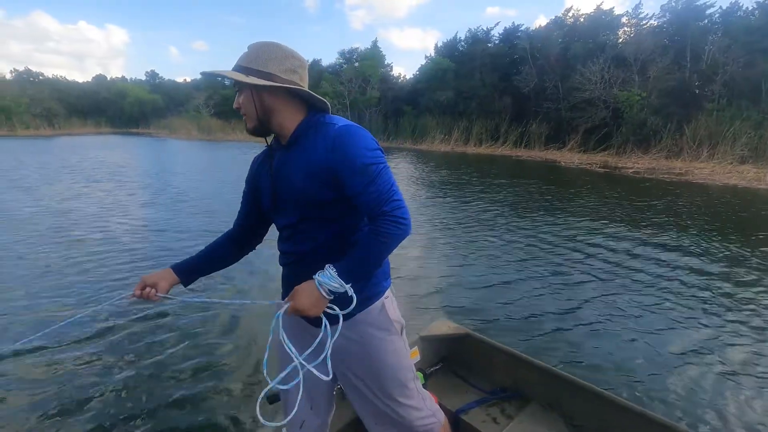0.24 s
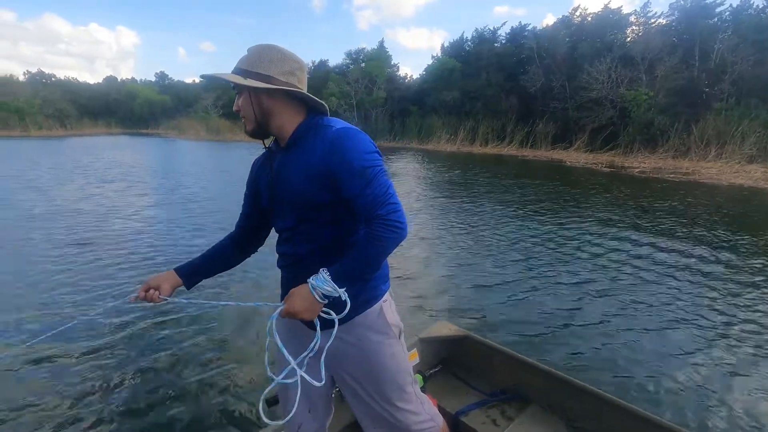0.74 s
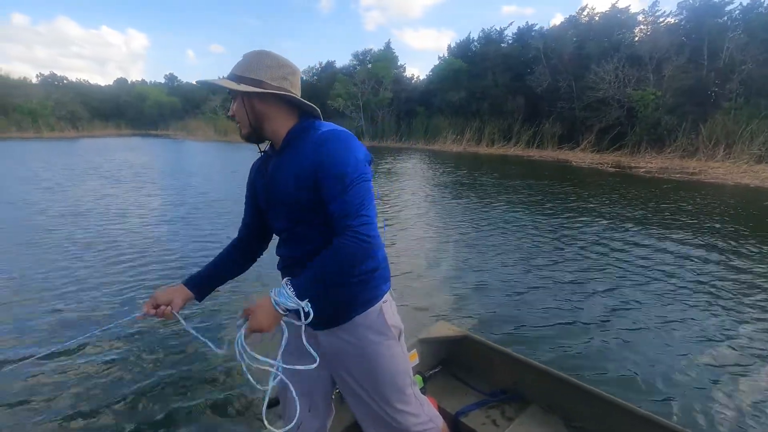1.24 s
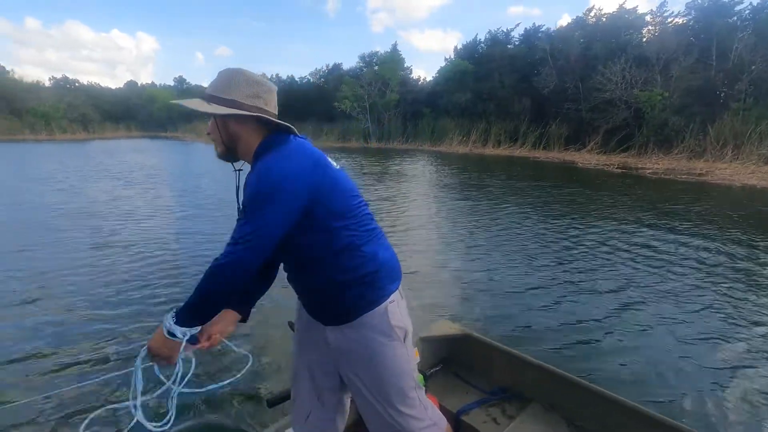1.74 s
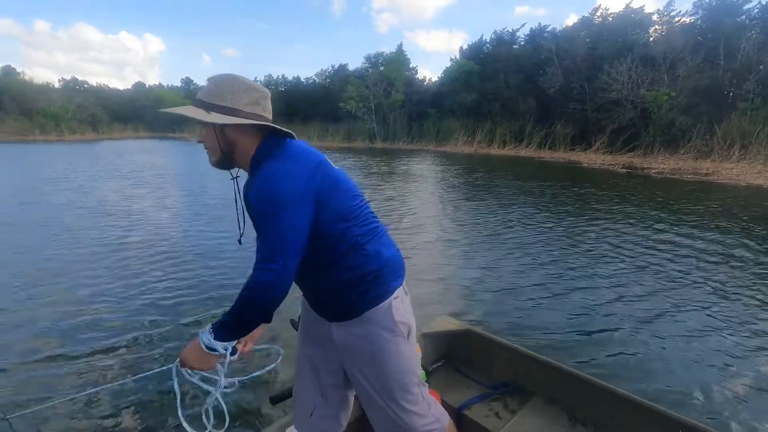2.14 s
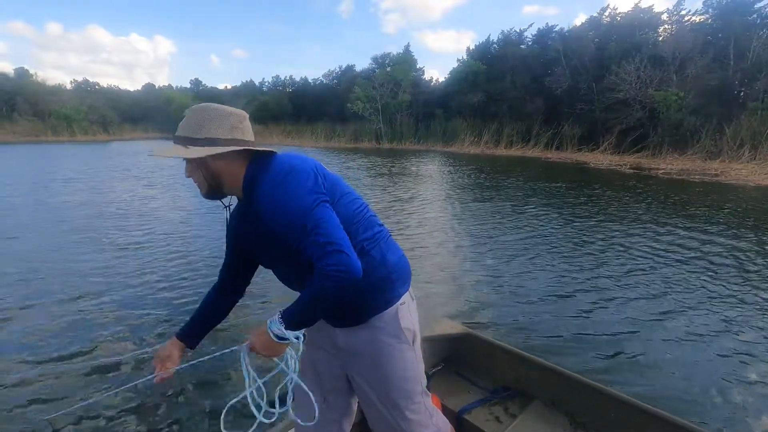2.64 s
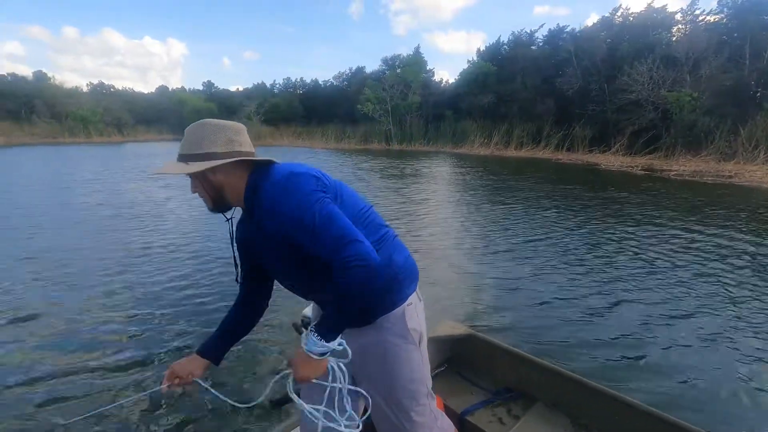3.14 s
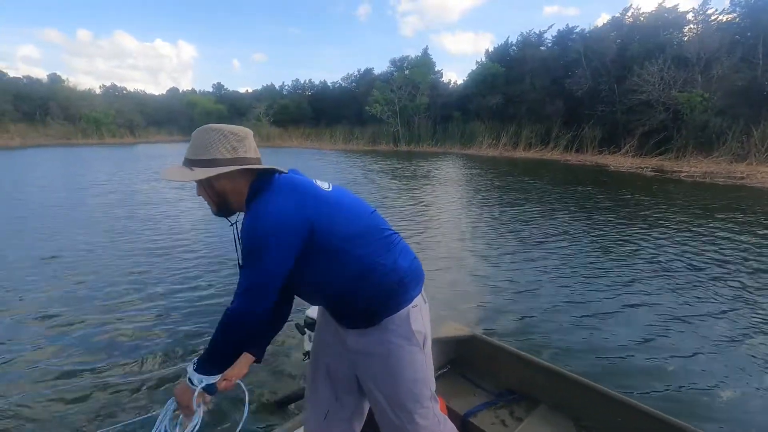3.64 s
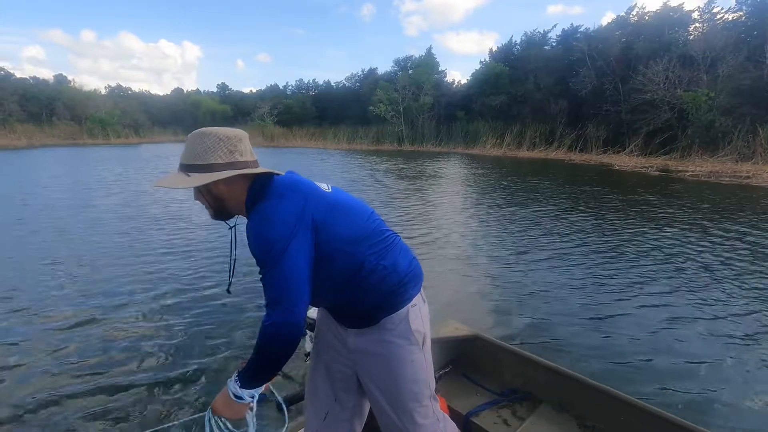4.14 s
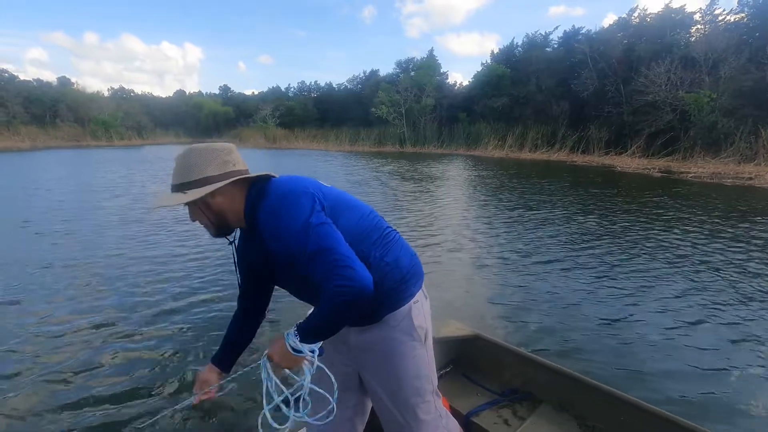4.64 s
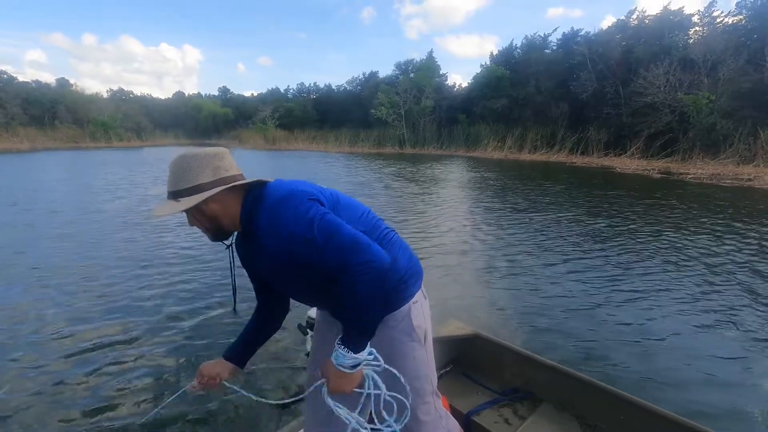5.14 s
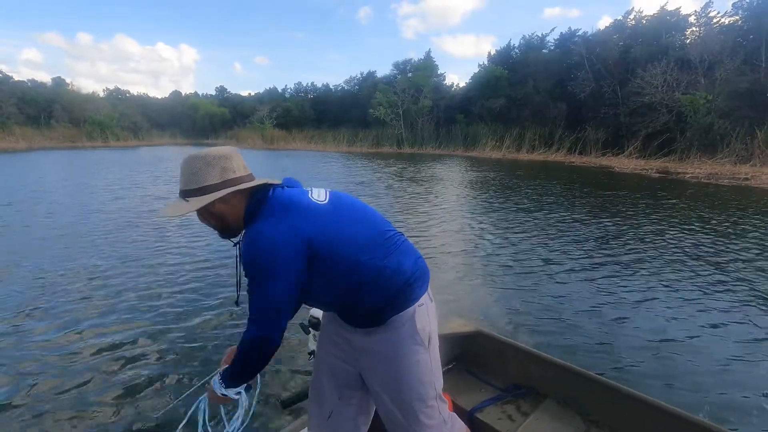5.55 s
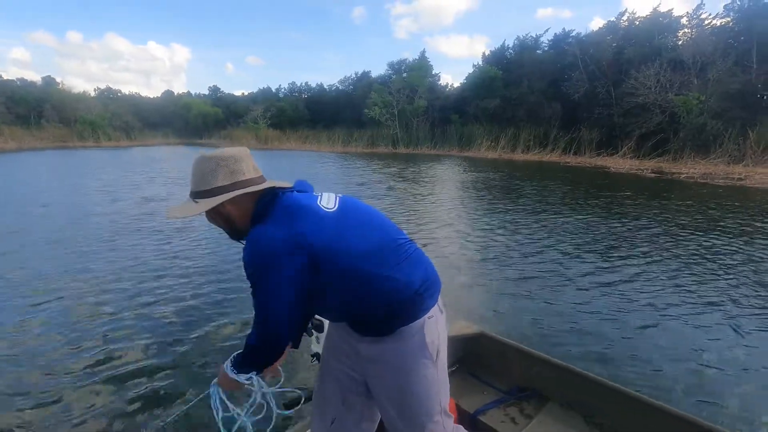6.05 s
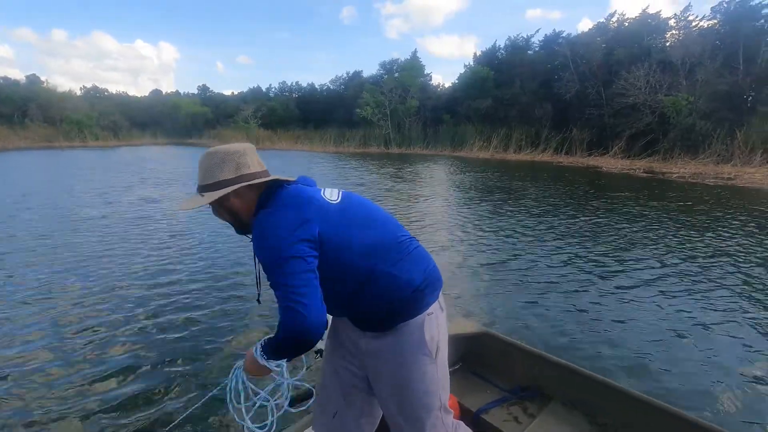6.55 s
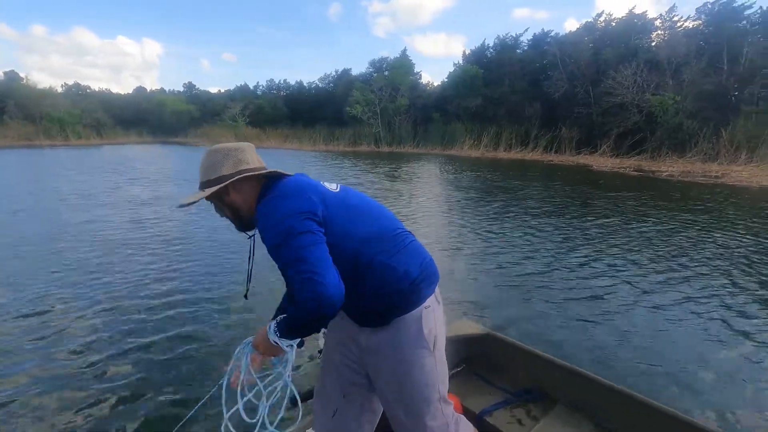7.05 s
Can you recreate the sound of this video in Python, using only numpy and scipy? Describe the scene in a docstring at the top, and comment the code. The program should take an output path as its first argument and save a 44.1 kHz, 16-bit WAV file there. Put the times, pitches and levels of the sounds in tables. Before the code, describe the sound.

A microphone clamped to a small metal boat picks up mostly hull vibration, close and muffled, with little treble. Rope drag and light knocks open the sound; at 0.3 s a loud hollow double thump rings low with a short metallic clatter. Smaller bumps follow, then strong thumps at 1.1 and 1.9 s, and a cluster at 2.5-2.8 s with brighter clicks and tiny pings from loose pieces. Deep wavering rumble swells under them. From 3 to about 4.5 s it is much quieter: soft low water wash, faint hull murmur, sparse taps. Modest knocks come at 4.65, 4.85 and 5.4 s, then gritty rope scraping swells around 5.7-6 s and again near 6.75 s. A thin, faint rising squeak runs 6.6-7.0 s. A heavy boom hits at 7.05 s and fades. Barely audible pulsing insects and hiss remain throughout.

```python
"""Metal boat on a still lake

Heard at a camera clamped to a small metal boat while a wet rope is hauled in by hand.
Shoves of weight ring the low hull modes; knocks and rope drag drive side-plate modes as noisy forces.
The clamp sways at two wavering sine tones; pressing water keeps the hull rumbling; the rope squeaks late on.
Filtered noise makes the wash and microphone hiss; a pulsed tone makes the insects."""
import sys
import numpy as np
from scipy import signal
from scipy.fft import rfft, irfft, next_fast_len
from scipy.io import wavfile
from scipy.ndimage import uniform_filter1d

SR = 44100
rng = np.random.default_rng(int(sys.argv[2]) if len(sys.argv) > 2 else 0)


def inscribe(sig):
    """Save sig as 16-bit PCM at rate SR to the path in sys.argv[1].

    A 1-D sig is mono; a 2-D sig holds one channel per row.
    Samples are clipped to [-1, 1] before scaling.
    """
    pcm = np.round(np.clip(np.atleast_2d(sig).T, -1, 1) * 32767)
    wavfile.write(sys.argv[1], SR, pcm.astype(np.int16))


N = 321489
T = np.arange(N) / SR

# hull modes, low to high: [f/Hz, relative level/dB, free t60/s, free swell time/s]
HULL_BOOM = [(130.3, -5.5, 0.46, 0.01), (156.23, -2.5, 0.61, 0.02)]
HULL_BODY = [(216.9, -2.5, 0.27, 0.0043), (234.64, -1.5, 0.22, 0.0022), (264, -4.5, 0.19, 0.014),
             (298.7, -16.5, 0.36, 0.0041)]
HULL_SKIN = [(340.7, -2.5, 0.11, 0.0024), (397.7, -8.5, 0.14, 0.0031), (454, -3.5, .12, 0.0015),
             (518.2, -1.5, 0.1, 0.001), (621, -11.5, 0.14, .003)]
# shoves of weight: [t/s, body level/dB, boom level/dB, skin level/dB, upper sway level/dB,
# favoured body f/Hz, shove length/s]
SHOVES = [(0, -33, -29, -38.5, -35.5, 193, 0.0029), (0.273, -5.5, -8, -12, -21.5, 227, 0.0028),
          (0.306, -5, -24.5, -19, -18.5, 203, 0.016), (.492, -32, -25, -41.5, -29.5, 233, 0.0092),
          (.55, -27.5, -37.5, -51, -31, 231, 0.011), (0.691, -31, -33.5, -62.5, -39, 216, 0.0076),
          (.79, -25, -37, -39, -38.5, 216, .0064), (.856, -28.5, -26, -44, -32, 212, 0.0069),
          (.918, -55, -27.5, -60, -25.5, 199.6, 0.025), (1.113, -20.5, -34.5, -22.5, -41.5, 259, 0.0055),
          (1.128, -9.5, -16, -22, -23, 219, 0.0081), (1.329, -31, -29.5, -42.5, -29, 246, 0.0021),
          (1.416, -25.5, -31.5, -42.5, -28, 240, 0.0079), (1.863, -11, -19.5, -21.5, -22.5, 258, 0.001),
          (1.893, -11, -29.5, -26.5, -21, 215, 0.0033), (2.19, -43.5, -37, -53, -31.5, 193, .018),
          (2.319, -26, -26, -50, -30, 191, 0.022), (2.352, -30.5, -25, -42, -32.5, 211, .008),
          (2.504, -22.5, -36.5, -34, -36, 215, .0083), (2.558, -12.5, -16, -37.5, -28, 235.5, 0.028),
          (2.579, -10, -18, -38.5, -23, 216.5, 0.015), (2.615, -15, -11.5, -31, -21.5, 222, 0.0083),
          (2.831, -22.5, -23.5, -43.5, -27.5, 274, 0.014), (4.397, -39, -50.5, -52, -56, 246, 0.0033),
          (4.657, -39, -46, -48, -49, 222, 0.0025), (4.849, -36, -44.5, -69, -47, 204, 0.0084),
          (5.088, -37, -52.5, -66, -42.5, 198, 0.011), (5.367, -19.5, -36.5, -29, -40, 243, .00091),
          (5.72, -25.5, -39.5, -35, -41.5, 272, 0.0018), (6.244, -34.5, -26.5, -49.5, -42, 218, 0.019),
          (6.556, -31.5, -34, -39.5, -53, 223, 0.0027), (6.69, -26, -47, -42, -63, 260.5, .005),
          (6.73, -46, -32, -53, -42, 213, .012), (6.829, -31, -31, -34, -36, 227, 0.0035),
          (6.918, -31, -58, -61.5, -52, 225, 0.0093), (7.064, -8, -8.5, -25.5, -20, 212, 0.012)]
# rope drag and water pressure: [t/s, low-plate force/dB, middle over low/dB, hull force/dB]
DRAG_LEVELS = [(0, -49.5, -13, -23.5), (.13, -63, -15, -59.5), (.4, -52.5, -13.5, -42.5),
               (.6, -65.5, -10, -44), (0.776, -57.5, -11.5, -40.5), (1.049, -58, -12.5, -37),
               (1.311, -82, -9, -49), (1.35, -55.5, -15, -35), (1.5, -60.5, -8, -59),
               (1.74, -51, -13.5, -49), (2.279, -62.5, -8, -47), (2.552, -48.5, -14, -44),
               (2.761, -65.5, -3, -45), (3.07, -62, -11.5, -56.5), (3.7, -66.5, -3.5, -50.5),
               (4.3, -67.5, -5.5, -54), (5.07, -61.5, -9, -52.5), (5.46, -47.5, -14, -42),
               (5.62, -51, -12, -47.5), (5.67, -41.5, -14, -43.5), (5.94, -40, -14, -34.5),
               (6.05, -55.5, -12, -52.5), (6.31, -52, -11.5, -40.5), (6.5, -59, -11, -49),
               (6.76, -42.5, -9.5, -36.5), (7.009, -48.5, -5.5, -37.5), (7.12, -59.5, -6, -43.5),
               (7.29, -65, -15, -58)]


def undb(db):
    """Decibels to gain."""
    return 10 ** (np.asarray(db) / 20)


def unit(x):
    """Scale to rms 1."""
    return x / np.sqrt(np.mean(np.abs(x) ** 2))


def walk(rate_hz):
    """Smooth random drift: normal draws held 1 / rate_hz, then averaged twice over that time."""
    hold = int(SR / rate_hz)
    steps = np.repeat(rng.standard_normal(N // hold + 1), hold)
    return 1.1 * uniform_filter1d(uniform_filter1d(steps, hold), hold)[:N]


def colour(x, spectrum):
    """Shape by a [f/Hz, gain/dB] spectrum, interpolated over log frequency."""
    hz, db = np.transpose(spectrum)
    f = np.maximum(np.fft.rfftfreq(N, 1 / SR), 1)
    gain = undb(np.interp(np.log(f), np.log(hz), db))
    return irfft(rfft(x) * gain, N)


def resonate(force, modes, side_db):
    """Double-pole [f/Hz, width/Hz, level/dB] modes, power-normalised; returns mid and a wider, unlike side."""
    ring, power = np.zeros((2, N)), 0
    unlike = force * np.sign(rng.standard_normal(N)) * undb(side_db)
    for hz, width_hz, db in modes:
        for channel, (push, wider) in enumerate(((force, 1), (unlike, 2.5))):
            pole = np.exp((2j * np.pi * hz - 1.5 * np.pi * width_hz * wider) / SR)
            mode = signal.lfilter([(1 - abs(pole)) ** 2], np.poly([pole, pole]), push).real
            ring[channel] += mode * undb(db) / np.sqrt(wider)
        power += undb(2 * db) * 1.86 * np.pi * width_hz / SR / 8
    return ring / np.sqrt(power)


def grit(rate_hz, spread_db):
    """Stick-slip force: random noise grains, 3 ms decay, of unequal size."""
    starts = (rng.random(N) < rate_hz / SR) * undb(spread_db * rng.exponential(size=N))
    envelope = signal.lfilter([1], [1, -np.exp(-1 / (.003 * SR))], starts)
    return unit(envelope * rng.standard_normal(N))


def struck(start_s, hz, peak_db, t60_s, swell_s, angle_rad):
    """One mode that swells, then dies; returns its slice and its sound."""
    t = T[:int(np.clip(t60_s, .005, 1.9) * SR)]
    shape = (1 - np.exp(-t / swell_s)) * np.exp(-np.log(1000) * t / t60_s)
    i = max(int(start_s * SR), 0)
    return slice(i, i + len(t)), undb(peak_db) * shape / shape.max() * np.sin(2 * np.pi * hz * t + angle_rad)


def sway():
    """Clamp and hull flex at two slow, wavering tones; water slops under the lower one."""
    low_centre_hz, upper_centre_hz = 38.66, 76.93
    slosh_re_low_db = -10.5
    fade_db_per_s, swell_s, rest_db = 32, 0.027, -61.5
    # low sway tone, before waver: [t/s, rms level/dB]
    low_levels = [(0.0, -40), (0.1, -27), (0.28, -42), (0.32, -29), (0.69, -24), (0.93, -32), (1.24, -22.5),
                  (1.34, -29), (2.25, -33.5), (2.43, -24), (2.52, -37), (2.68, -21.5), (2.92, -43),
                  (3.86, -46), (3.9, -61.5), (4.48, -39.5), (4.59, -52), (4.87, -32.5), (5.93, -40),
                  (5.99, -30.5), (6.25, -40), (6.8, -31.5), (6.9, -20), (6.96, -32.5), (7.15, -22.5),
                  (7.29, -33)]
    low_db = np.interp(T, *np.transpose(low_levels)) + 4.5 * walk(16)
    # the upper tone takes the latest shove's level, then fades to its rest
    shove_s, upper_db = np.transpose([(row[0], row[4]) for row in SHOVES])
    latest = np.maximum(np.searchsorted(shove_s, T, "right") - 1, 0)
    upper_gain = undb(upper_db[latest] - fade_db_per_s * (T - shove_s[latest]))
    swell = int(swell_s * SR)
    upper_gain = uniform_filter1d(upper_gain, swell, origin=(swell - 1) // 2)  # looks back only
    upper_gain = upper_gain + undb(rest_db + 4 * walk(2.8))
    low = np.sin(2 * np.pi * np.cumsum(low_centre_hz * (1 + .06 * walk(6.4))) / SR)
    upper = np.sin(2 * np.pi * np.cumsum(upper_centre_hz * (1 + .015 * walk(9.4))) / SR)
    slosh_band = signal.butter(2, [22, 110], "band", fs=SR, output="sos")
    slosh = unit(signal.sosfilt(slosh_band, rng.standard_normal(N)))
    low_part = undb(low_db) * (np.sqrt(2) * low + undb(slosh_re_low_db) * slosh)
    return low_part + upper_gain * np.sqrt(2) * upper


def thumps():
    """Each shove swells every hull mode and lets it ring; weight on the hull shortens body and skin rings."""
    free_share, free_share_per_s = 0.62, 19.5  # share of free ring time: at no shove, gained per s of shove
    angle_spread_rad = 1 / 3  # modes start nearly in step
    out = np.zeros(N + 2 * SR)
    chance = rng.standard_normal((len(SHOVES), 3, 8))
    for (s, body_db, boom_db, skin_db, _, spot_hz, shove_s), luck in zip(SHOVES, chance):
        share = min(free_share + free_share_per_s * shove_s, 1)
        groups = (
            (HULL_BODY, body_db, 40, share),
            (HULL_BOOM, boom_db, 0, 1),  # always rings freely
            (HULL_SKIN, skin_db, 0, share),
        )
        for (modes, group_db, focus, free), draws in zip(groups, luck):
            for (hz, mode_db, t60_s, swell_s), draw in zip(modes, draws):
                # body modes far from the favoured pitch speak less
                peak_db = group_db + mode_db - focus * abs(np.log(hz / spot_hz))
                where, ring = struck(s, hz, peak_db, t60_s * free, free * swell_s + shove_s,
                                     draw * angle_spread_rad)
                out[where] += ring
    return out[:N]


def pings():
    """Loose pieces jolted into ringing, one decaying sine each."""
    # pings: [t/s, peak level/dB, f/Hz, t60/s]
    loose_pieces = [(0.489, -39.5, 1066, 0.11), (.70, -32.5, 1337, 0.042), (0.799, -50, 3290, 0.037),
                    (.97, -34.5, 357, 0.096), (1.128, -17, 1082, 0.019), (2.364, -38.5, 2600, 0.033),
                    (2.488, -28.5, 3354, 0.05), (2.501, -23, 1810, 0.041), (2.628, -29, 1090, 0.082),
                    (3.541, -53.5, 1400, 0.05), (3.866, -51, 2114, 0.037), (4.224, -46, 1424, 0.034),
                    (4.849, -40.5, 1470, 0.077), (5.202, -45, 3260, 0.017), (5.491, -38.5, 437, 0.071),
                    (6.327, -35.5, 445, 0.14), (6.654, -29.5, 740, 0.072)]
    out = np.zeros(N + 2 * SR)
    for s, db, hz, t60_s in loose_pieces:
        where, ring = struck(s, hz, db, t60_s, 0.045 * t60_s, 0)
        out[where] += ring
    return out[:N]


def drag_force():
    """Dragging rope: stick-slip grit plus noise, as forces on the low, middle and top plate modes."""
    s, low_db, lift_db, _ = np.transpose(DRAG_LEVELS)
    low_db, lift_db = np.interp(T, s, low_db), np.interp(T, s, lift_db)
    middle_db = low_db + lift_db
    top_db = -72 + 0.83 * (middle_db + 65)  # top follows middle: -72 dB where middle is -65 dB
    drag = 0.68 * grit(350, spread_db=4.5) + 0.79 * rng.standard_normal(N)
    drag *= undb(5.45 * walk(25))
    top_drag = 0.47 * drag + 0.62 * rng.standard_normal(N)
    return np.array([undb(low_db) * drag, undb(middle_db) * drag, undb(top_db) * top_drag])


def knock_force():
    """Rope and gear knocks: short decaying noise forces on the low, middle and top plate modes."""
    rise_s, contact_t60_s, top_re_middle_db = 0.0031, 0.075, -11
    # knocks: [t/s, low-plate force/dB, middle over low/dB]
    knocks = [(.023, -42.5, -23), (0.045, -34.5, -12.5), (0.173, -42, -16), (.203, -34.5, -14),
              (.27, -17.5, -12.5), (.305, -20, -13), (.486, -39.5, -27), (0.528, -39, -25),
              (.622, -39, -20), (0.686, -31.5, -17), (0.701, -40, -12), (0.752, -31.5, -11.5),
              (0.795, -35.5, -20), (0.855, -39, -15), (0.888, -44, -8), (.967, -30.5, -7.5),
              (1.076, -28.5, -19), (1.112, -17.5, -11.5), (1.131, -25, -43), (1.275, -50.5, -11),
              (1.329, -32.5, -41), (1.389, -43, -5.5), (1.426, -39, -16), (1.468, -40.5, -15),
              (1.545, -43, -11), (1.706, -41.5, -10.5), (1.859, -25.5, -10), (1.9, -28, -11),
              (2.079, -51.5, 0.5), (2.18, -33.5, -26), (2.301, -36, -4.5), (2.345, -39.5, -4),
              (2.365, -28.5, -8.5), (2.488, -34.5, -1), (2.501, -23.5, -0.5), (2.555, -33.5, -18),
              (2.62, -26, -10.5), (2.642, -29.5, -13), (2.832, -27, -18.5), (3.162, -40, -33),
              (3.667, -44, -12), (3.717, -44.5, -0.5), (3.863, -56, 1), (4.141, -46, -13),
              (4.227, -49.5, -4), (4.399, -43.5, -15), (4.656, -31.5, -23), (4.849, -32, -14.5),
              (5.091, -47, -4), (5.203, -45, -1), (5.363, -35.5, -29), (5.569, -31.5, -17),
              (5.647, -34, -23), (5.829, -29.5, -11), (5.898, -33.5, -3.5), (5.949, -25.5, -16),
              (6.268, -34.5, -10), (6.331, -30, -15), (6.485, -39.5, -13), (6.555, -24.5, -19.5),
              (6.732, -42.5, -1.5), (6.787, -28.5, -11.5), (6.93, -39, -5), (6.948, -33, -10),
              (7.037, -18, -13), (7.063, -23, -12.5)]
    force = np.zeros((3, N))
    contact = .5 * grit(830, spread_db=-4.0) + 0.7 * rng.standard_normal(N)
    for s, low_db, bright_db in knocks:
        i = int((s - .0015) * SR)  # force starts just ahead of the listed time
        t = T[:min(int(.3 * SR), N - i)]
        shape = np.minimum(t / rise_s, 1) * np.exp(-np.log(1000) * t / contact_t60_s)
        levels_db = low_db + np.array([0, bright_db, top_re_middle_db + bright_db])
        force[:, i:i + len(t)] += undb(levels_db)[:, None] * shape * contact[i:i + len(t)]
    return force


def plates():
    """Knocks and the dragging rope drive the same side-plate modes."""
    # side-plate modes, three bands: [f/Hz, width/Hz, relative level/dB]
    low_modes = [(642.6, 23, -7.5), (731.7, 44.6, -7), (781, 156, -8.5), (975, 31.4, -3), (1075.5, 43.8, 3),
                 (1188, 96, -3), (1292, 93, -4), (1411, 74, -5.5), (1577, 152, -10), (1694, 50, -14),
                 (1807, 60, -16.5), (870, 180, -22.5)]
    middle_modes = [(2090, 40, 2.5), (2540, 120, 4), (2746, 70, 2.5), (3194, 130, -4), (3326, 180, 0.5),
                    (3640, 150, -7)]
    top_modes = [(3800, 67, -3), (4595, 200, -1), (4800, 210, -1.5), (5230, 450, -1.5), (5833, 730, -15),
                 (7580, 120, -13)]
    low, middle, top = drag_force() + knock_force()
    rings = resonate(low, low_modes, side_db=-10.5)
    rings += resonate(middle, middle_modes, side_db=-17.5)
    return rings + resonate(top, top_modes, side_db=-34)


def hull_rumble():
    """Water pressing on the hull keeps its modes murmuring, wider than the free ring as water damps it."""
    s, _, _, hull_db = np.transpose(DRAG_LEVELS)
    wet_modes = []
    for modes, group_db in ((HULL_BOOM, -2), (HULL_BODY, 0.1), (HULL_SKIN, -16)):
        wet_modes += [(hz, 4 / t60_s, db + group_db) for hz, db, t60_s, _ in modes]
    force_db = np.interp(T, s, hull_db) + 1.7 * walk(24)
    return resonate(undb(force_db) * rng.standard_normal(N), wet_modes, side_db=-23)


def wash():
    """Water and far-off air: coloured noise, unlike in mid and side, with little low end in the side."""
    # wash spectrum: [f/Hz, relative level/dB]
    wash_spectrum = [(12, -35), (20, -8.5), (48, 2.5), (114, -7), (220, -10), (374, -20), (840, -51.5),
                     (1050, -23.5), (2250, -41), (5580, -39.5), (8360, -52.5), (10900, -80.5),
                     (18400, -120)]
    mid, side = (unit(colour(rng.standard_normal(N), wash_spectrum)) for _ in range(2))
    side = signal.sosfilt(signal.butter(2, 500, "high", fs=SR, output="sos"), side)
    return undb(-55.5 + 0.63 * walk(3.0)) * np.array([mid, side])


def insects():
    """Insects buzz in quick pulses: a fixed tone under a sharply peaked periodic envelope."""
    tone_hz, pulse_centre_hz = 5720, 52
    beat = 2 * np.pi * np.cumsum(pulse_centre_hz * (1 + 0.0016 * walk(0.9))) / SR
    buzz = unit(np.exp(2.5 * np.cos(beat)) * np.sin(2 * np.pi * tone_hz * T))
    buzz = buzz * undb(-88 + 2 * walk(0.62))
    return np.array([buzz, .3 * buzz])  # mid, side


def squeak():
    """Wet rope on the rim: a narrow rasp whose pitch mostly climbs as the rope tightens."""
    # squeak: [t/s, f/Hz, level of the rasp that modulates the sine/dB]
    glide = [(6.574, 2844, -89), (6.602, 3000, -52), (6.701, 3250, -72), (6.8, 3290, -59), (6.9, 3550, -62),
             (7.03, 3590, -75), (7.05, 3500, -85)]
    s, hz, db = np.transpose(glide)
    rasp = unit(signal.sosfilt(signal.butter(2, 180, fs=SR, output="sos"), rng.standard_normal(N)))
    tone = np.sin(2 * np.pi * np.cumsum(np.interp(T, s, hz)) / SR)
    return undb(np.interp(T, s, db, left=-200, right=-200)) * rasp * tone


def ports(mid, side):
    """Two microphone ports on one body: the same shake arrives with a pitch-dependent lean and lag."""
    # ports: [f/Hz, left minus right/dB, left lead/rad]
    port_offsets = [(60, 0, .03), (200, 0.73, 0.094), (350, 0.5, 0.47), (493, 2, .7), (806, 1.5, 1.21),
                    (940, 1.5, 0.15), (1250, 0.5, -1), (1750, 1, -1.2), (2040, 5, 1.3), (2570, 2, 1.2),
                    (2880, -2, -2.1), (3160, -0.5, 1.3), (5440, -1.5, -0.76), (7800, 4, -0.47)]
    hz, lean_db, lead_rad = np.transpose(port_offsets)
    size = next_fast_len(N + SR)
    log_f = np.log(np.maximum(np.fft.rfftfreq(size, 1 / SR), 1))
    lean = np.interp(log_f, np.log(hz), lean_db)
    lead = np.interp(log_f, np.log(hz), lead_rad)
    half = undb(lean / 2) * np.exp(.5j * lead)  # each port takes half the offset
    left = irfft(rfft(mid + side, size) * half, size)[:N]
    right = irfft(rfft(mid - side, size) / half, size)[:N]
    return np.array([left, right])


def scene():
    """All layers summed as mid and side, then heard at the two ports."""
    mid, side = plates() + hull_rumble() + wash() + insects()
    mid = mid + sway() + thumps() + pings() + squeak()
    return ports(mid, side)


def record(dry):
    """The camera rounds deep low swings and cuts the top; faint hiss is added after the cut."""
    slow = signal.sosfiltfilt(signal.butter(2, 700, fs=SR, output="sos"), dry)
    rounded = dry - slow + 0.71 * np.tanh(slow / 0.73)
    cut = signal.sosfilt(signal.ellip(6, .2, 40, 8500, fs=SR, output="sos"), rounded)
    white = undb(-101) * rng.standard_normal(dry.shape)
    hiss = signal.sosfilt(signal.butter(4, 13000, fs=SR, output="sos"), white)
    return cut + hiss


dry = scene()
out = record(dry)
inscribe(out)
```